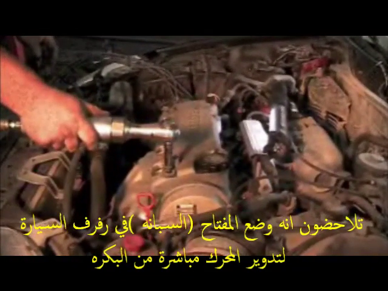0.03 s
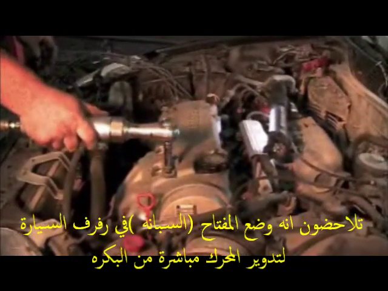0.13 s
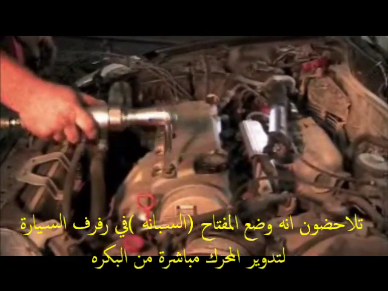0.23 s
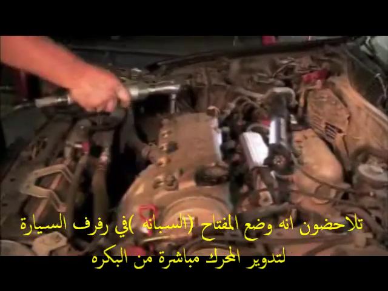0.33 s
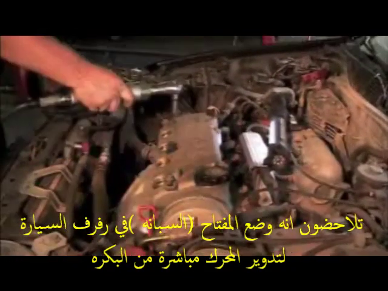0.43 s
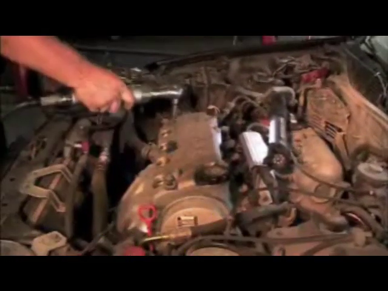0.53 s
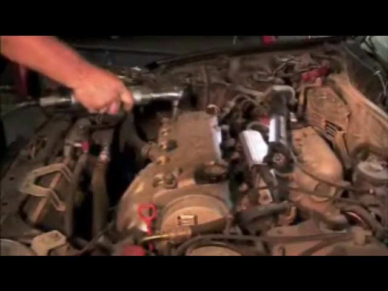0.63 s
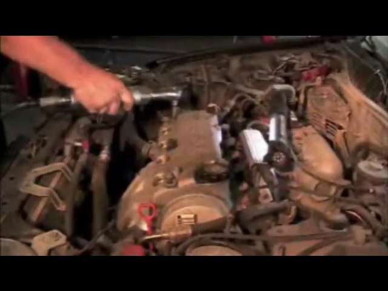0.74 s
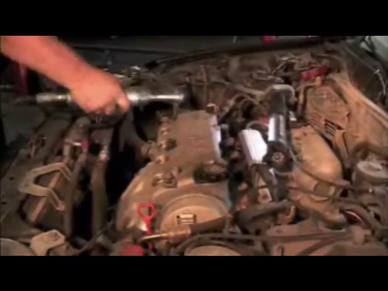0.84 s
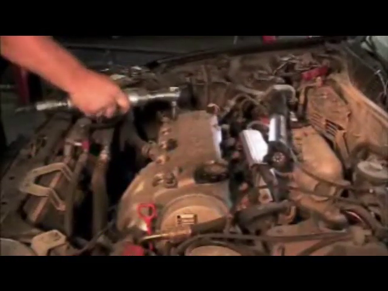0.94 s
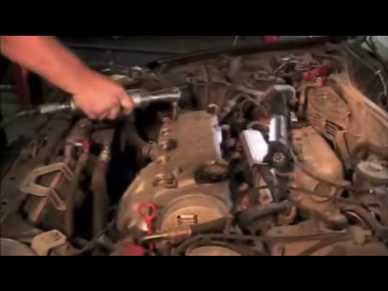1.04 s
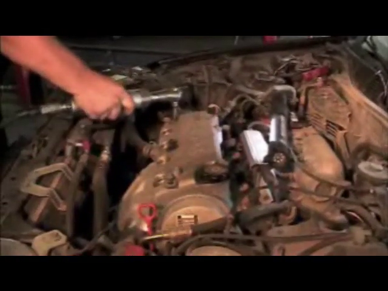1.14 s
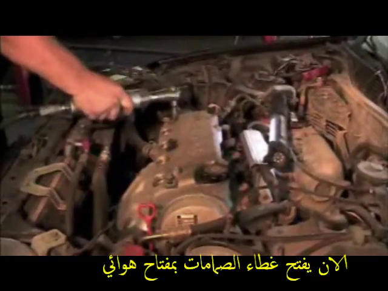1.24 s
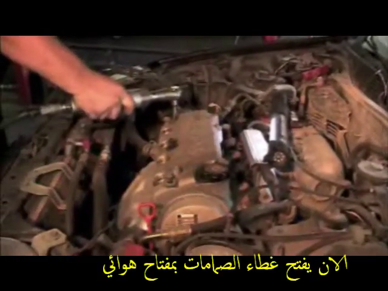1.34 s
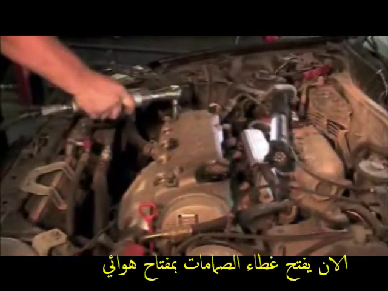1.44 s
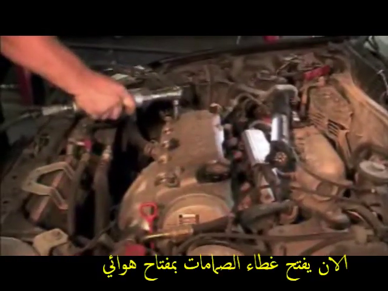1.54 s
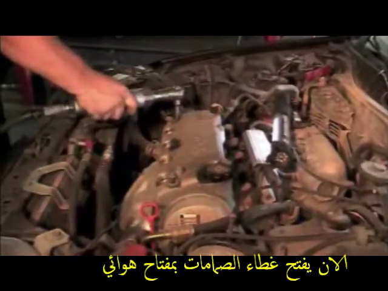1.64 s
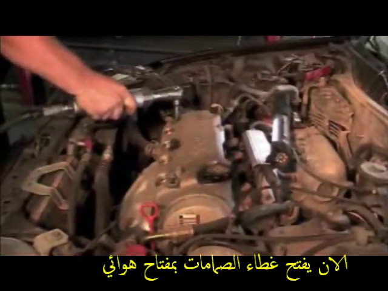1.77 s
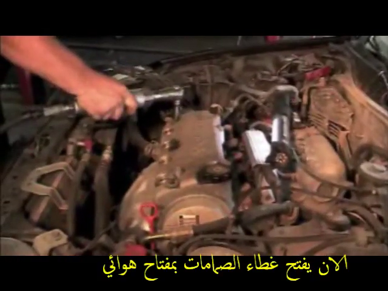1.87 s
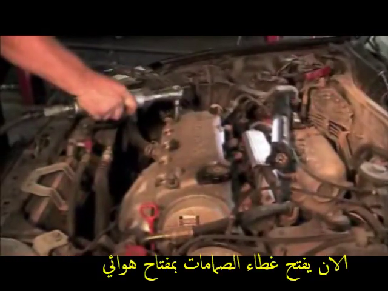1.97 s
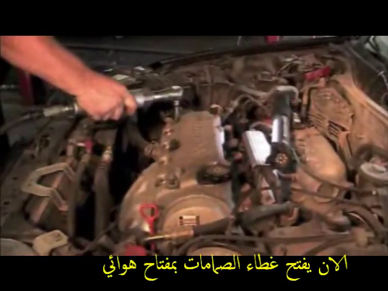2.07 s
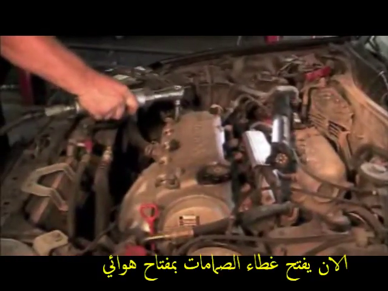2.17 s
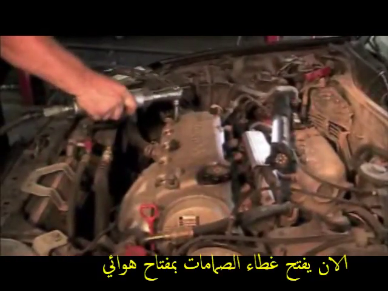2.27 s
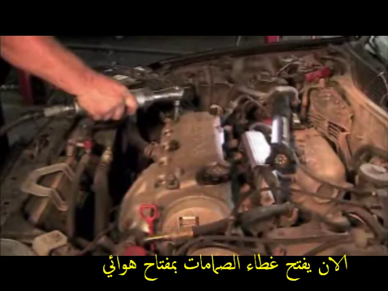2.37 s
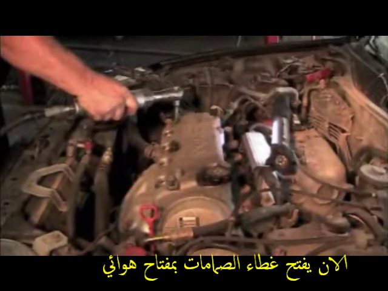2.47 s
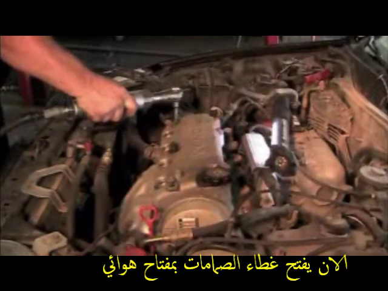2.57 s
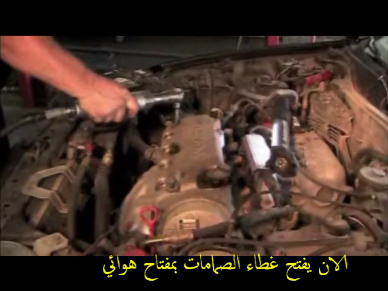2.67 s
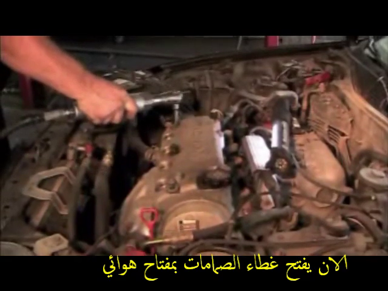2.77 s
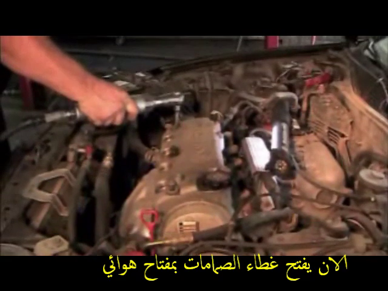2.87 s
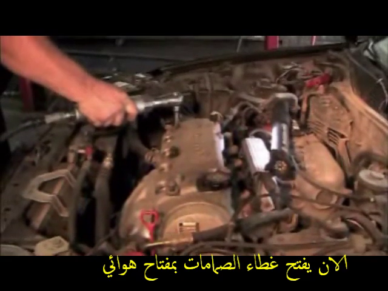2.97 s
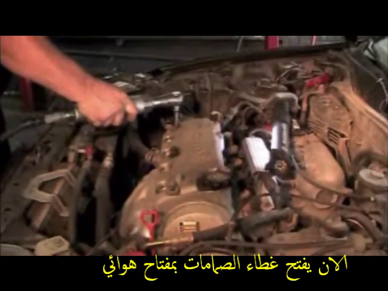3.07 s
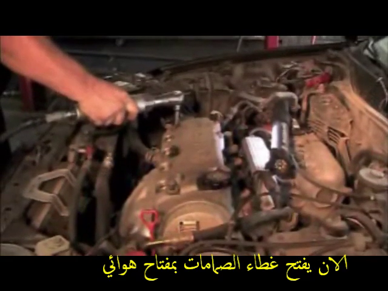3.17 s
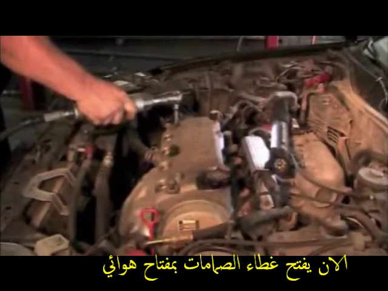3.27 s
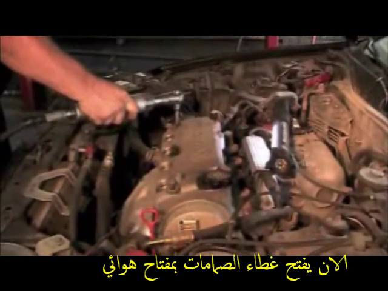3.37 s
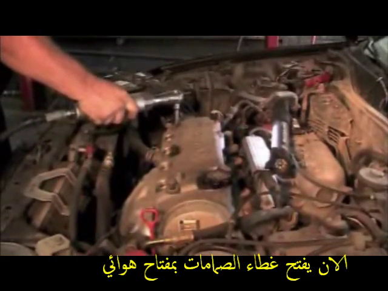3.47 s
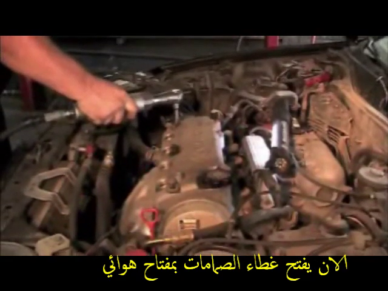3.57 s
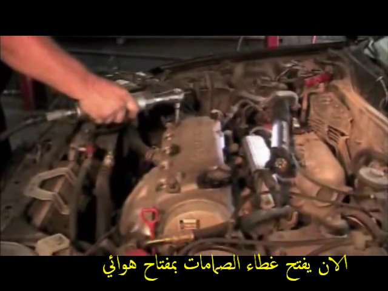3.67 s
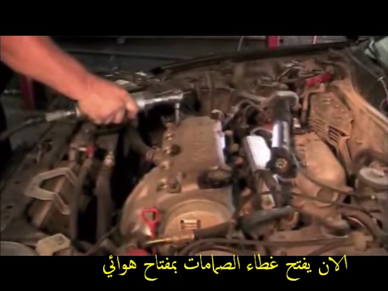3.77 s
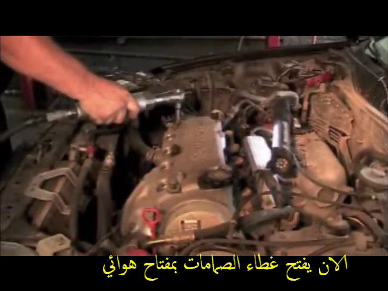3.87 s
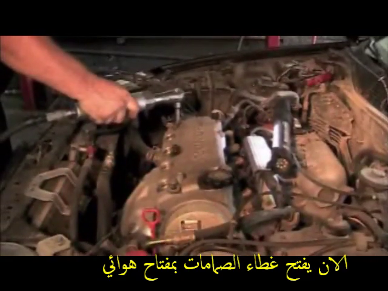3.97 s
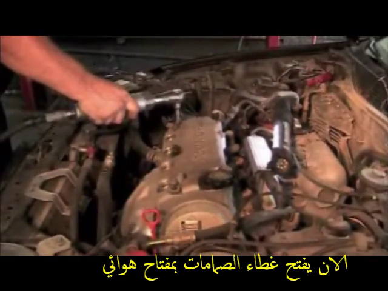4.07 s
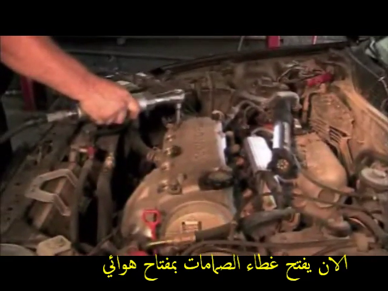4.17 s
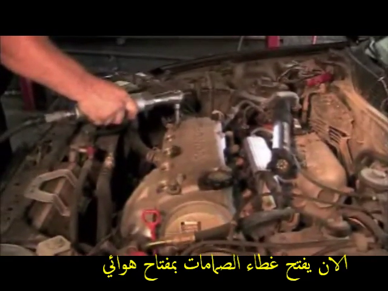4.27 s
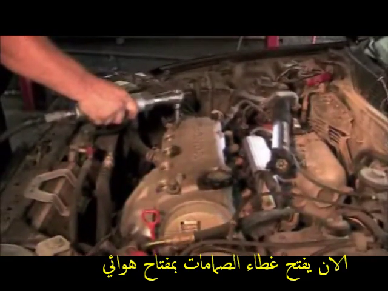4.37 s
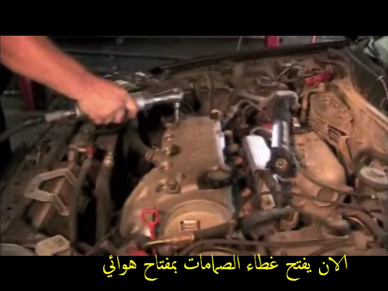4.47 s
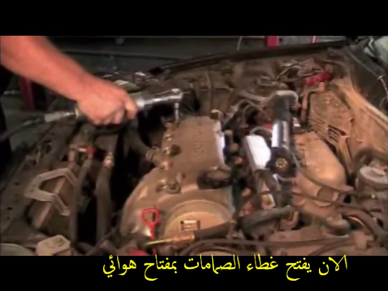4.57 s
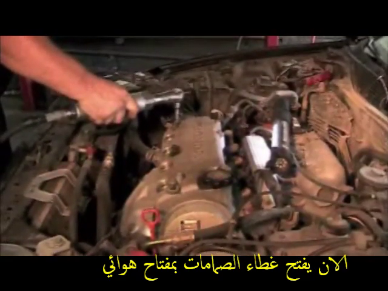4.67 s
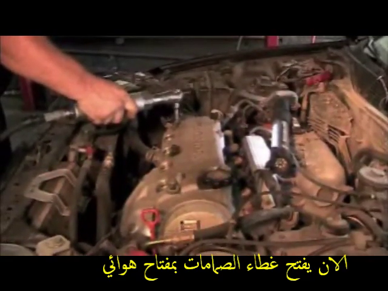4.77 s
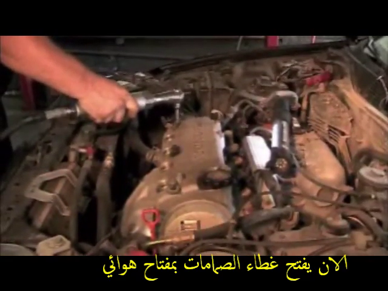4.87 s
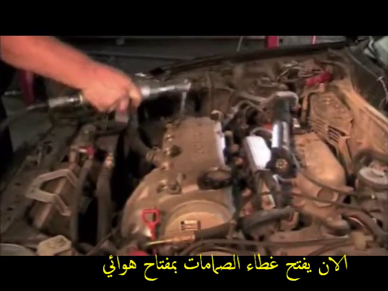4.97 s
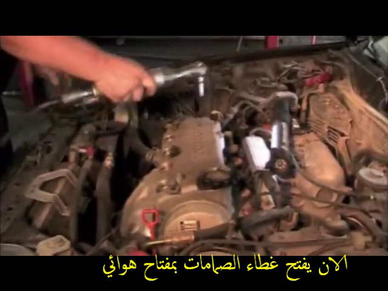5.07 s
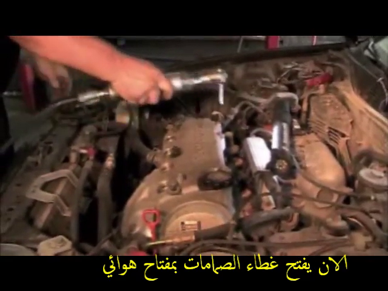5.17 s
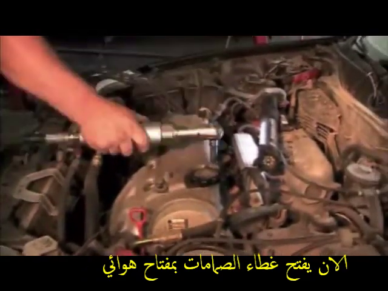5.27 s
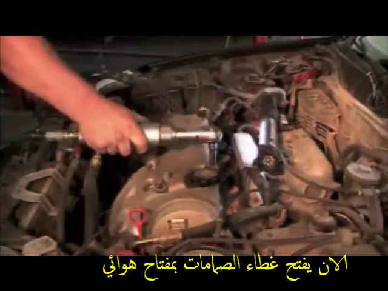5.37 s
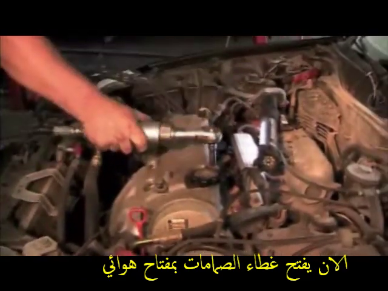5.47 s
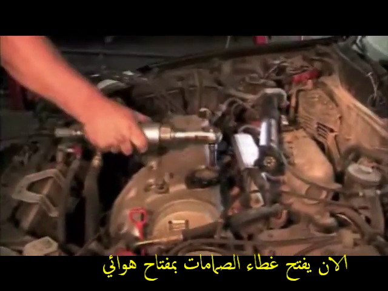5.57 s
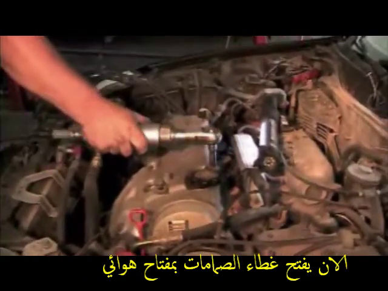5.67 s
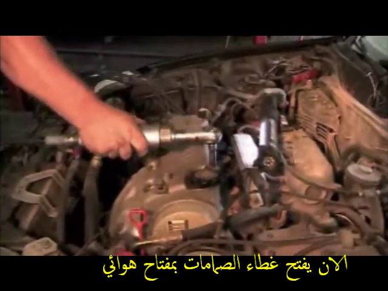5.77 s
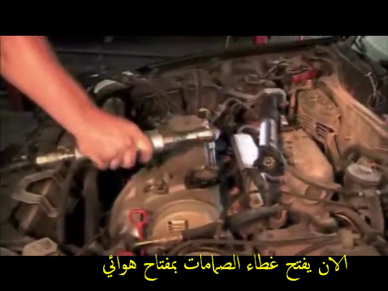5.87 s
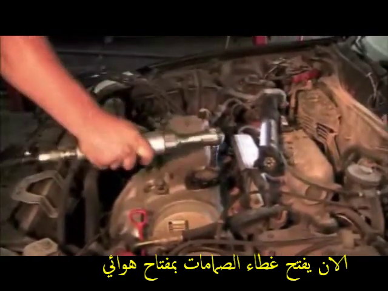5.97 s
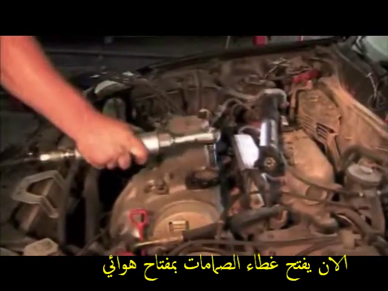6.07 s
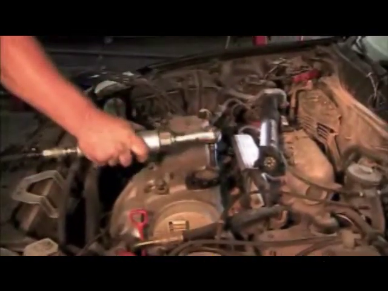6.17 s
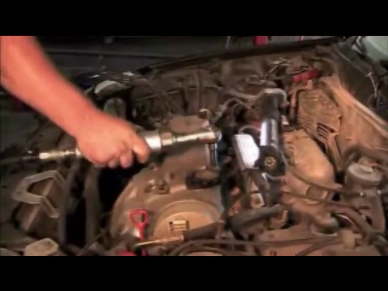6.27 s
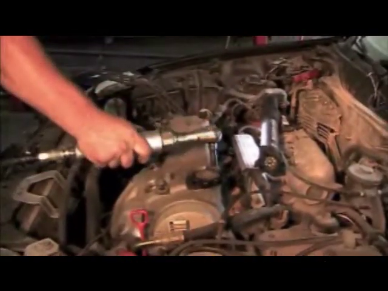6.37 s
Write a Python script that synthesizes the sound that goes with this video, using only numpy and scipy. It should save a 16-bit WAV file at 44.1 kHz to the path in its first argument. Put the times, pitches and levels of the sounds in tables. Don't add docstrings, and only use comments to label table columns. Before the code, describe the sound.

Shrill pneumatic ratchet whining over hissing air in a ringing workshop: a clipped tail, one long steady run, short pause, then another burst.

```python
import sys
import numpy as np
from scipy import signal
from scipy.fft import rfft, irfft, next_fast_len
from scipy.io import wavfile
from scipy.ndimage import uniform_filter1d, map_coordinates

SR = 44100
rng = np.random.default_rng(int(sys.argv[2]) if len(sys.argv) > 2 else 0)


def linear_from_db(decibels):
    return 10 ** (np.asarray(decibels, float) / 20)


def file_out(sig):
    cols = np.atleast_2d(sig).T
    lim = np.clip(cols, -1, 1)
    pcm = np.round(lim * 32767).astype(np.int16)
    wavfile.write(sys.argv[1], SR, pcm)


N = 282681
LEAD = SR // 2
TIME = (np.arange(N + LEAD) - LEAD) / SR
ORDERS = (1, 2, 3, 5)


def unit(x):
    return x / np.sqrt(np.mean(x ** 2) + 1e-20)


def along(points, hz):
    f, v = np.transpose(points)
    return np.interp(np.log(hz + 1), np.log(f + 1), v)


def curves(rows):
    s, *cols = np.array(sorted(map(tuple, rows))).T
    return [np.interp(TIME, s, c) for c in cols]


def wobble(knots_per_s):
    coarse = np.arange(0, len(TIME) + 16, 16)
    knots = rng.standard_normal(int(len(TIME) * knots_per_s / SR) + 4)
    return np.interp(np.arange(len(TIME)), coarse, map_coordinates(knots, [coarse * knots_per_s / SR]))


def filtered(x, response):
    m = next_fast_len(x.shape[-1] + 8192)
    return irfft(rfft(x, m) * response(np.fft.rfftfreq(m, 1 / SR)), m)[..., :x.shape[-1]]


def noise(spectrum):
    return unit(filtered(rng.standard_normal(len(TIME)), lambda hz: linear_from_db(along(spectrum, hz))))


# f/Hz, density/dB per Hz
FLOOR = [(20, -10), (50, -6), (120, -2.5), (170, -7.5), (400, -11.5), (1100, -14), (1700, -18), (4000, -25),
         (12000, -25), (14000, -55)]


def floor_noise():
    return linear_from_db(-56) * np.array([noise(FLOOR), linear_from_db(-9.0) * noise(FLOOR)])


# f/Hz, t60/s
SHOP_T60 = [(150, 0.19), (1000, 0.55), (3000, 1), (7000, 0.73), (12000, 0.34)]
# f/Hz, level/dB
SIDE_DB = [(100, 0), (600, -18.5), (1300, -18), (2200, -21), (4000, -13), (8000, -11.5), (11000, -3.5),
           (14000, 4.5)]
# delay/s, level/dB
WALLS = [(.0047, -19), (.0083, -17), (.0129, -18), (.019, -17), (.027, -18), (.036, -19)]


def shop(tones, rest, wet_db=-12, side_dies=0.67):
    hz, t, z = signal.stft(rng.standard_normal((2, SR)), SR, nperseg=256)
    t60_s = along(SHOP_T60, hz)[:, None] * np.array([1, side_dies])[:, None, None]
    tail = signal.istft(z * linear_from_db(-60 * t / t60_s), SR, nperseg=256)[1]
    tail = tail / np.linalg.norm(tail, axis=1, keepdims=True)
    x = tones + rest
    beam_db = [(800, 0), (1300, -5), (2400, -8.5)]
    beamed = filtered(tones, lambda f: linear_from_db(along(beam_db, f))) + rest
    feed = np.pad([beamed, x], ((0, 0), (300, 0)))
    mid, side = signal.fftconvolve(feed, tail, axes=1)[:, :len(x)]
    early = np.zeros(len(x))
    for k, (s, db) in enumerate(WALLS):
        early += (-1) ** k * linear_from_db(db) * np.pad(x, (round(s * SR), 0))[:len(x)]
    side = filtered(side, lambda f: linear_from_db(along(SIDE_DB, f)))
    return np.array([linear_from_db(-0.74) * (x + early) + linear_from_db(wet_db) * mid, side])


# t/s, peak/dB, crack/dB, ring/dB
TICKS = [
    (0.3651, -32.5, -7, 8),
    (0.412, -41, -2, 8),
    (0.5466, -30, -1, -8),
]
# f/Hz, level/dB, t60/s
SOCKET = [(1350, -6, .02), (2020, -2, .016), (2900, -5, .015), (3500, -5, .012), (5300, -16, .01)]


def ticks():
    out, t = np.zeros(len(TIME)), np.arange(SR // 8) / SR
    for s, db, crack_db, ring_db in TICKS:
        ring = np.zeros(len(t))
        for hz, level_db, t60_s in SOCKET:
            decay_db = level_db + ring_db + rng.normal(0, 2) - 60 * t / t60_s
            ring += linear_from_db(decay_db) * np.sin(2 * np.pi * hz * t)
        crack = linear_from_db(crack_db - 60 * t / 0.028) * rng.standard_normal(len(t))
        rise = 1 - np.exp(-t / 0.0012)
        out[LEAD + round(s * SR):][:len(t)] += linear_from_db(db - 5) * (ring + crack) * rise
    return out


# f/Hz, density/dB per Hz
GUST = [(25, -33), (60, -17.5), (200, -1.5), (500, -4), (1200, 2), (2000, -6.5), (5000, -16)]
# t/s, level/dB
PUFFS = [
    (-.07, -38),
    (.61, -22),
    (4.71, -40),
    (5.095, -35),
    (5.19, -42),
    (5.565, -37),
]


def gusts(strain, air_db, air_ref_db):
    gain = (linear_from_db(-55.5) + linear_from_db(-34) * strain) * linear_from_db(air_db - air_ref_db)
    for s, db in PUFFS:
        slope_db_per_s = np.where(TIME < s, 605, 353)
        gain = gain + linear_from_db(db - slope_db_per_s * abs(TIME - s))
    return unit(linear_from_db(3.6 * wobble(30)) * noise(GUST)) * gain


# f/Hz, width/Hz, level/dB
COVER = [(254, 31, -5), (331, 45, 0.5), (430, 69, 2), (796, 350, -17)]


def knocks(rock, gain):
    blows = np.diff(np.floor(rock / (2 * np.pi)), prepend=0) * linear_from_db(0.63 * wobble(90))
    blows = blows + 0.0068 * (1 + np.cos(rock)) ** 2 * rng.standard_normal(len(TIME))

    def cover(f):
        modes = enumerate(COVER)
        return sum((-1) ** k * linear_from_db(db) * 1j * f * w / (c * c - f * f + 1j * f * w) for k, (c, w, db) in modes)
    return unit(filtered(blows, cover)) * gain


# f/Hz, density/dB per Hz
EXHAUST = [(25, -55), (70, -25), (200, -22.5), (600, -13), (1100, -15.5), (1500, -10.5), (2300, -2.5),
           (3400, -3.5), (6500, -2.5), (8000, -1), (9200, 0), (10600, -5), (12800, -6), (14000, -15.5)]
# f/Hz, density/dB per Hz
NOZZLE = [(7500, -62), (8500, -12), (9100, 8), (9800, 0), (11000, -60)]


def exhaust(rock, air_db):
    chop = 1 + 0.12 * np.cos(16 * rock) + 0.21 * np.cos(4 * rock)
    chop = chop + 0.032 * np.cos(2 * rock) + 0.04 * np.cos(rock)
    hiss = unit(chop * linear_from_db(0.81 * wobble(500)) * noise(EXHAUST))
    hiss = hiss * linear_from_db(air_db + 1.42 + 0.74 * wobble(12))
    return hiss + noise(NOZZLE) * linear_from_db(air_db - 13 + 6.0 * wobble(7))


# multiple of vane rate, index of main tone followed, level under it/dB, gain at full strain/dB
WEAK = [(.75, 0, -33, 0), (1.75, 1, -22, 0), (4, 2, -10, 12), (6, 3, -9, 10), (7, 3, -11, 0)]


def whine(phase, rock, strain, levels_db):
    tones = np.zeros(len(TIME))
    for k, db in zip(ORDERS, levels_db):
        sway = 1 + np.clip(strain * np.sqrt(k), 0, .95) * np.cos(rock + k)
        tones += linear_from_db(db + 0.67 * wobble(25)) * np.sin(k * phase + k * k) * sway
    for k, main, db, rise_db in WEAK:
        level_db = levels_db[main] + db + rise_db * strain + 0.64 * wobble(5.3)
        tones += linear_from_db(level_db) * np.sin(k * phase + k * k)
    return np.sqrt(2) * tones


def catch(x):
    return x * np.exp(-x ** 2 / 2)


# valve opens/s, let go/s, free vane rate/Hz, stored-pressure surge/Hz
PULLS = [
    (-.45, -.1, 1366, 0),
    (.543, 4.672, 1361, 44),
    (5.066, 7, 1332.5, 0),
]
# loudness/dB, loaded-head knock/dB, share of the catch at release
PULL_DB = [
    (6, -76, .1),
    (0.07, -53, 0.78),
    (-1.1, -46.5, .1),
]
# t/s, share of free speed, strain 0-1, valve/dB
SPIN = [
    [(-.4, 1, .03, 0)],
    [(.583, .12, .01, -13), (.597, .207, .15, 4.5), (.62, .285, .3, 4), (.637, .459, .25, 3),
     (.655, .715, .25, 1.5), (.674, .84, .3, .8), (.71, .966, .3, .4), (.73, .986, .3, .6),
     (.77, .971, .25, .6)],
    [(5.096, .294, .08, .5), (5.12, .58, .1, -.8), (5.15, .755, .2, .3), (5.2, .84, .3, 1.2),
     (5.275, .885, .38, -.5), (5.315, .972, .22, .5), (5.36, .992, .26, -.8), (5.52, .975, .33, -.8),
     (5.57, .935, .3, -.8)],
]
# level/dB, then dB per turn, per tilt, per roll
ORDERS_DB = [(-25.5, -0.9, -2, .1), (-31.5, 9.5, -1.1, .1), (-36, 0.3, -0.66, 5.6), (-36.5, -1, 3, .1)]
# f/Hz, level/dB
PORT = [(150, -35.5), (300, -7.5), (560, 2), (1250, -1), (2300, 2.3), (4000, 1.23), (5300, -17),
        (6600, -0.8)]
# t/s, turn, tilt, roll
AIM = [(.9, .1, 0.049, -1.15), (1.08, 0.079, -0.53, -.6), (1.33, -0.66, -1.2, 0.1),
       (1.45, -0.39, -1.25, 0.085), (1.9, -1.1, -0.81, 0.2), (2.06, -1.5, 0.77, 0.8),
       (2.55, -0.84, 1.1, -0.3), (2.85, -0.76, 1.4, -2), (3.0, -0.19, 0.73, -0.45),
       (3.42, -0.46, 0.86, -0.5), (3.52, 0.32, 0.25, -0.53), (4.62, 0.41, 0.96, 0.68),
       (5.24, 0.68, .6, 0.57), (5.36, -0.27, -3.4, -0.2), (5.57, 0.53, -1.7, -0.5),
       (5.68, 0.44, -0.84, 1.4), (5.88, -0.11, -1.3, -1), (5.94, 0.11, -2.3, 0.5)]
AIR_DB = -28


def drive(pull):
    opens, lets_go, free_hz, surge_hz = PULLS[pull]
    loud_db, knock_db, catches = PULL_DB[pull]
    rows = SPIN[pull]
    cracked = (opens, .05, 0, -10)
    settled = (rows[-1][0] + .042, 1, .02, 0)
    share, strain, valve_db = curves([cracked, *rows, settled])
    held, coast = np.clip(TIME, opens, lets_go) - opens, np.maximum(TIME - lets_go, 0)
    sag_hz_per_s, surge_s, coast_s = 7, .43, .057
    vane_hz = free_hz - sag_hz_per_s * held + surge_hz * np.exp(-held / surge_s)
    vane_hz = vane_hz * share * np.exp(-(coast / coast_s) ** 1.35)

    slip_s, slip_width_s, slip_db = 5.559, .0055, 10.5
    air_db = AIR_DB + loud_db + valve_db + slip_db * catch((TIME - slip_s) / slip_width_s)
    air_db = air_db + 2 * (coast > 0) - 350 * coast
    knock = (linear_from_db(knock_db) * strain / .3 + linear_from_db(-62.5)) * (coast == 0)
    strain = np.clip(strain + .2 * np.tanh(coast / coast_s), 0, .9)

    whine_db = loud_db + 1.5 * valve_db + 19 * (1 - np.exp(-coast / .011)) - 418 * coast
    catch_s, catch_width_s, catch_db = .0135, .0065, 12
    whine_db = whine_db + catches * catch_db * catch((TIME - lets_go - catch_s) / catch_width_s)
    soft_db = 13 * np.exp(-((share - .56) / .14) ** 2 / 2)
    break_db = 3.5 * np.sqrt(share) * np.tanh(20 * (1 - share))
    aim = np.array(curves(AIM))
    levels_db = []
    for k, (db, *per) in zip(ORDERS, ORDERS_DB):
        level_db = whine_db + db + np.dot(per, aim) + along(PORT, k * vane_hz)
        level_db = level_db + break_db * np.clip(wobble(70), -2, 1)
        levels_db.append(level_db - (k - 1) * 899.5 * coast - (k > 1) * soft_db)
    gate = uniform_filter1d(1. * (TIME > opens), size=40)
    return np.array([vane_hz, strain, air_db, knock, gate, *levels_db])


def ratchet(controls):
    vane_hz, strain, air_db, knock, gate, *levels_db = controls
    cycles = np.cumsum(vane_hz * (1 + (0.001133 + 0.013 * strain) * wobble(60))) / SR
    rock = 2 * np.pi * cycles / 16
    phase = 2 * np.pi * cycles + .5 * strain * np.sin(rock)
    rest = knocks(rock, knock) + exhaust(rock, air_db) + gusts(strain, air_db, AIR_DB)
    return whine(phase, rock, strain, levels_db) * gate, rest * gate


# t/s, gain
FADE_OUT = [(0, 1), (.06, 0.65), (.165, 0)]
# t/s, gain
FADES = [(.15, 0.098), (.33, 0.72), (.4, 1), (4.9, 0.94), (5.05, 0.25), (5.065, 0.12), (5.1, 1)]


def scene():
    controls = drive(pull=0)
    controls[4] *= TIME < .3
    first = (shop(*ratchet(controls)) + linear_from_db(1.5) * floor_noise()) * curves(FADE_OUT)[0]
    tones, rest = ratchet(np.where(TIME < PULLS[2][0] - 50 / SR, drive(pull=1), drive(pull=2)))
    duck = np.interp(TIME, [.58, .62, 4.7, 4.95], linear_from_db([0, -31, -6, -4.5]))
    later = (shop(tones, rest + ticks()) + floor_noise() * duck) * curves(FADES)[0]
    mid, side = (first + later)[:, LEAD:]
    return np.array([mid + side, mid - side])


def top_cut(x):
    return signal.sosfilt(signal.butter(12, 14230, fs=SR, output="sos"), x)


# f/Hz, left minus right/dB
CAPSULES = [(60, 0), (300, -1.3), (1200, -3), (2200, 0.4), (12000, -0.6)]


def record(dry):
    mix = filtered(dry, lambda hz: linear_from_db(np.outer([.5, -.5], along(CAPSULES, hz))))
    return top_cut(mix)


dry = scene()
out = record(dry)
file_out(out)
```